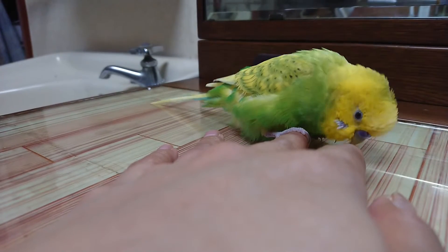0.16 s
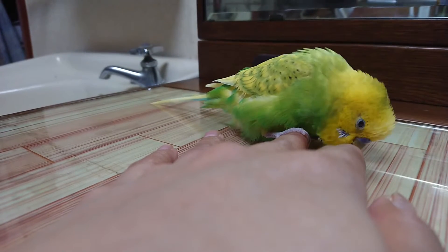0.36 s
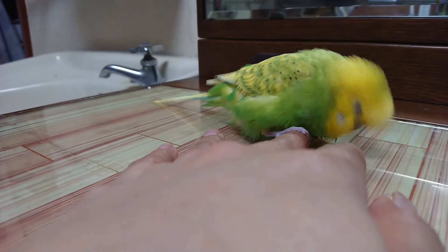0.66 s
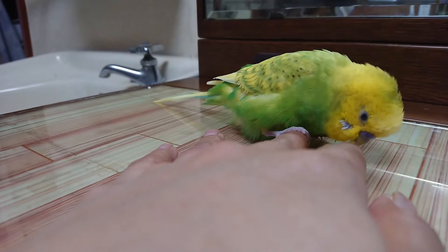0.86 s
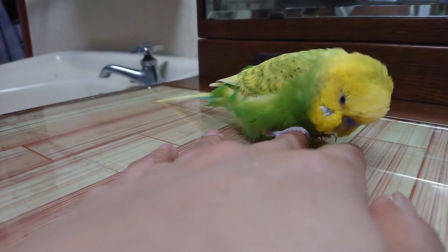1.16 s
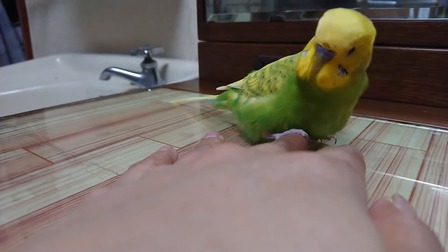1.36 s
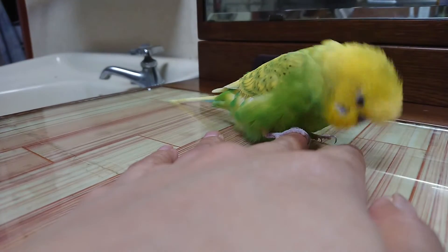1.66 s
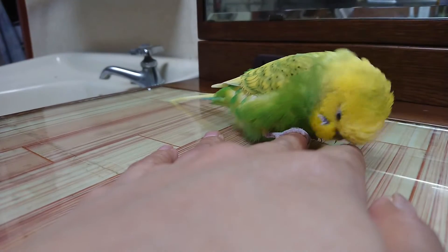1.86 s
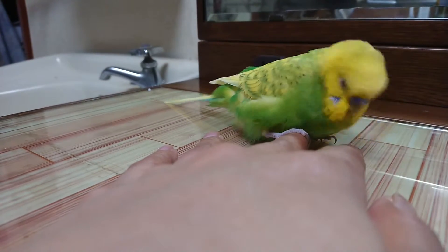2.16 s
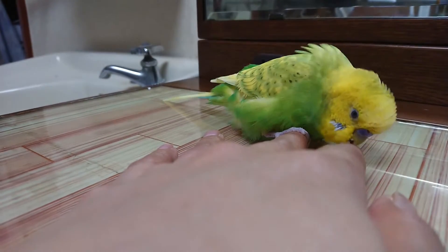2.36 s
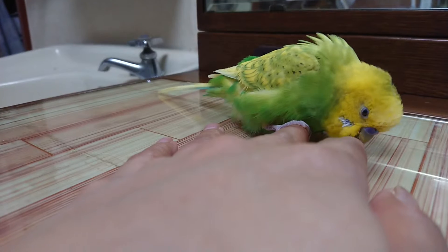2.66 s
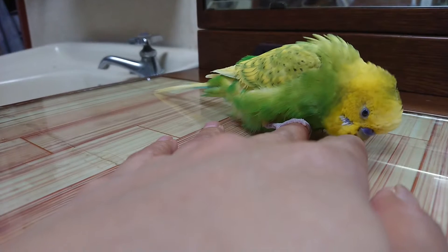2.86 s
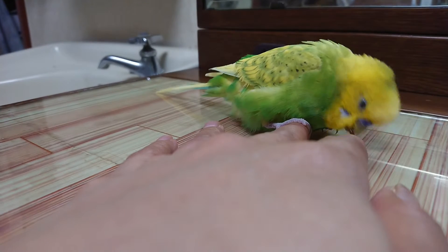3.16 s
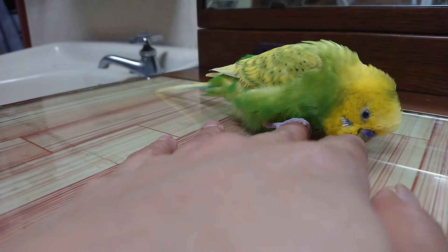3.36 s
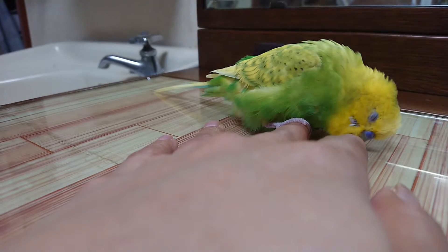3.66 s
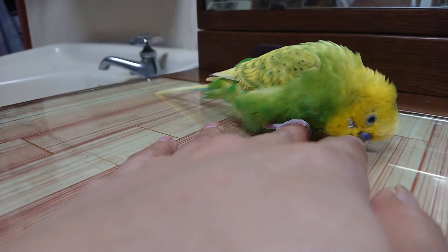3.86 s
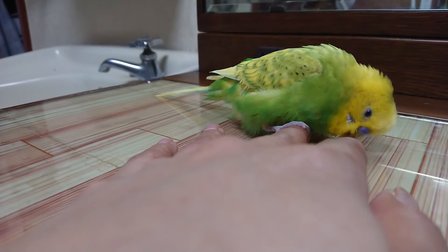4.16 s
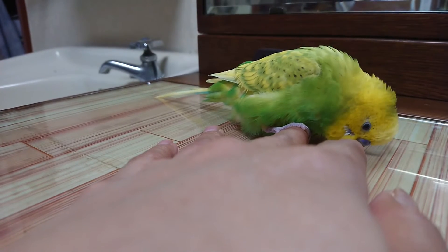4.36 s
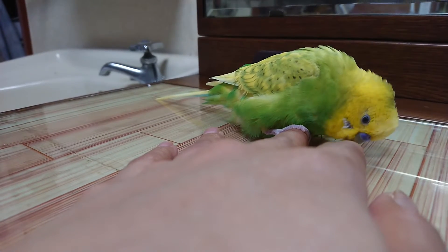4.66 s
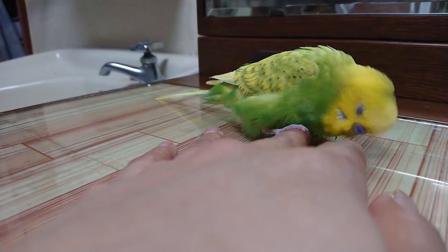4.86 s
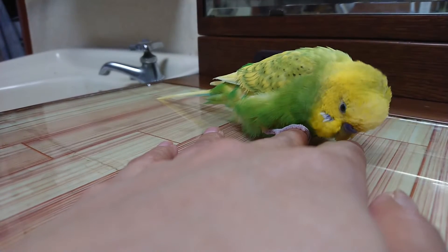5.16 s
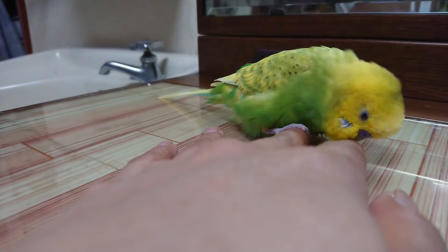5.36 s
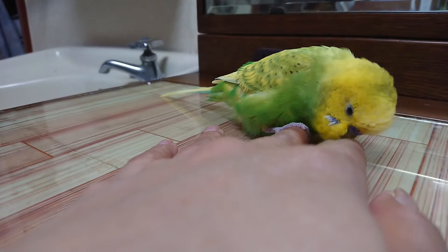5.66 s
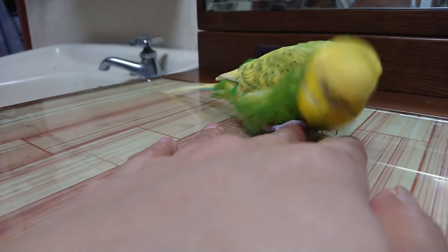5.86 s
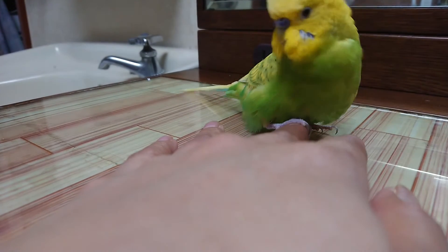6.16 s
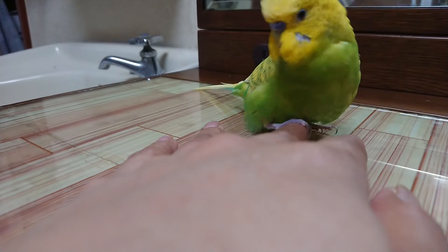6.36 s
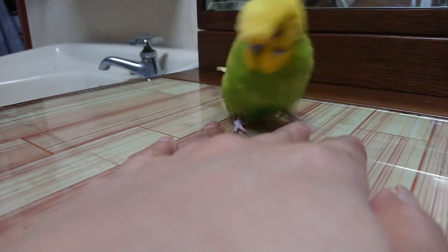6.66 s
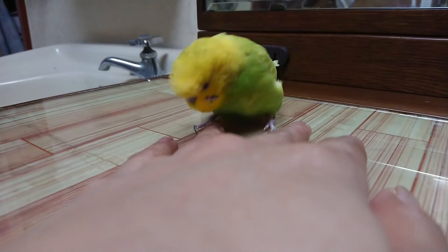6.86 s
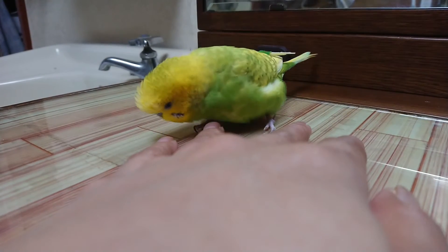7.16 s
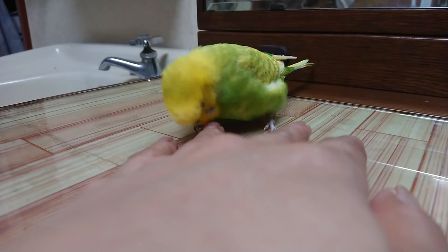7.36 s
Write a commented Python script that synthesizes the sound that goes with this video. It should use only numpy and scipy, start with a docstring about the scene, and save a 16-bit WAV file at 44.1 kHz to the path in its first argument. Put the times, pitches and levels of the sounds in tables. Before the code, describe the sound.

A budgerigar close to the right of a stereo microphone starts with light ticking and nibbling, then breaks into bright, fluttery chattering syllables with snapping clicks. Between bouts come tiny ticks, a feather brush and distant wavering chirps, plus a few rasping squawks in the room. A deep, unsteady hum like a vehicle outside swells and recedes beneath. The last run of chatter is densest and stops mid-song. Short, hard-walled indoor reverberation.

```python
"""Beak ticks and nibbles open the scene: a budgerigar sits on a washstand in a small hard room, close to
the right microphone. A low hum, probably a vehicle outside, soon rises and later falls, over room noise.
From 1.5 s the bird warbles in bouts: repeated syllables of gliding, fluttering whistles, with dry clicks.
Harsh shaken whistles squawk at 1.9 s and 4 s, and faint wavering chirps murmur between 2.2 s and 5.4 s.
The last bout, from 5.4 s, runs to the end. Clicks and ticks are ringing resonances; rustles are noise."""
import sys
import numpy as np
from scipy import signal
from scipy.fft import rfft, irfft, next_fast_len
from scipy.io import wavfile
from scipy.ndimage import map_coordinates

SR = 44100
rng = np.random.default_rng(int(sys.argv[2]) if len(sys.argv) > 2 else 0)


def int16_out(signal):
    """Quantize to a 16-bit WAV file."""
    q = np.round(np.clip(np.atleast_2d(signal).T, -1, 1) * 32767)
    wavfile.write(sys.argv[1], SR, q.astype(np.int16))


N = 331191
TIME = np.arange(N) / SR

# overtones of the whistle before throat and blowing: (multiple of the pitch, level/dB)
OVERTONES = [(2, -29), (3, -39.5), (4, -47.5)]
# colour of the hiss on rough notes: (f/Hz, level/dB per Hz)
RASP = [(700, -9), (1500, -11), (2800, 5.5), (4300, -7.5), (5800, -1), (9000, -8.5), (13000, -20.5)]


def song(treble_db, edge_s=0.0018, swell_db=5, flutter_hz=190, flutter_db=8, swing_hz=150, jitter_hz=50,
         wander_hz=80, rasp_db=-26, overtone_growth=0.43, full_db=-22, beak_hz=11500):
    """Each note is one glide of the syrinx; a slower second vibration shakes level and pitch of rough notes."""
    out, hiss = np.zeros(N), noise(RASP)
    jitter, unrest, wander = wobble(500), wobble(90), wobble(75)
    # the flutter's own speed strays around flutter_hz
    flutter = np.sin(phase_of(flutter_hz * np.exp(0.38 * unrest)))
    for s, length, pitches, note_db, rise_db, rough in glides():
        t = np.arange(int((length + edge_s) * SR)) / SR
        u = t / t[-1]
        span = (int(s * SR) + np.arange(len(t))) % N
        rough = np.clip(rough, 0, 1)
        # a smooth curve through start, middle and end pitch
        glide = np.polyval(np.polyfit([0, .5, 1], pitches, 2), u)
        shake_hz = swing_hz * flutter[span] + jitter_hz * jitter[span] + wander_hz * wander[span]
        phase = phase_of(glide + rough * shake_hz)
        # air pressure swells towards the middle of the note
        swell = swell_db * (np.sin(np.pi * u) - 2 / np.pi)
        level_db = note_db + rise_db * np.clip(2 * u - 1, -.5, .5) + swell
        gate = np.sin(np.pi / 2 * np.clip(np.minimum(t, t[-1] - t) / edge_s, 0, 1)) ** 2
        throb = rms_one(from_db(flutter_db * rough * flutter[span]))
        # harder blowing brings out the overtones
        blown_db = overtone_growth * (level_db - full_db)
        overtones = sum(from_db(db + blown_db) * throat(k * glide) * np.sin(round(k) * phase)
                        for k, db in OVERTONES)
        edge = np.sqrt(2) * throb * overtones + from_db(rasp_db) * rough * hiss[span]
        voice = np.sqrt(2) * throb * np.sin(phase) + from_db(treble_db[span]) * edge
        add(out, s - edge_s / 2, from_db(level_db) * gate * voice)
    return cut(out, beak_hz, "low", order=3)


# Syllable shapes, one row for each glide:
# (delay t/s, length t/s, start f/Hz, middle f/Hz, end f/Hz, level/dB, crescendo/dB, roughness 0-1)
# chirrup: a dip, a flick up, a high shelf and a deep scoop
CHIRRUP = [(0, .023, 4390, 2844, 3416, 0.5, 7.5, .6), (.024, .012, 3607, 4640, 4140, -11.5, -3, .2),
           (.035, .023, 4150, 3780, 3800, -2, 7.5, .45), (.057, .032, 3400, 2147, 3506, -3, 10.5, .6)]
# twitter: a dip, a fall, a rise and a rough shelf
TWITTER = [(0, 0.0299, 3990, 3140, 3730, -5.5, 7, 0.295), (.029, 0.016, 3520, 3053, 3060, -2, 11.5, .45),
           (.048, .024, 2050, 2570, 2780, -4, 4, .6), (.071, 0.031, 3490, 3390, 3610, -1, -1.5, 0.57)]
# stair: two rough steps upwards and a double top note
STAIR = [(0, .017, 2777, 2390, 1850, 0, -2.5, 0.79), (.018, .021, 3237, 3030, 2750, -1.4, 7.5, 0.86),
         (.039, .011, 3854, 3830, 3850, -0.23, -3, 0.4), (.051, .014, 3500, 3600, 3700, -1, 6.5, 0.55)]
# climb: two dips and a short top note
CLIMB = [(0, .03, 2950, 2081, 2790, -1.5, -2, 0.82), (.031, 0.025, 3550, 2937, 3240, 4.5, 0.5, .35),
         (.059, .013, 3315, 3495, 3310, 4, -9.5, 0.57)]
# swoop: two rises that lead to a clear, loud peak
SWOOP = [(0, .024, 1820, 2100, 2616, -10, 9, 0.97), (.026, .025, 1838, 2301, 3076, -7.5, 13.5, 0.61),
         (.052, .02, 3200, 2850, 2720, 2, -2.5, .3)]
# loop: a run-up, an accent, a dip and a tail
LOOP = [(-.012, 0.01, 2180, 2305, 2660, -11, 10.5, 0.94), (0, 0.014, 2520, 2627, 2580, 1.5, 2, 0.47),
        (.016, .019, 2050, 1965, 2350, -9.5, 1.5, 0.95), (.035, .016, 2376, 2720, 2800, -5.5, -7, .5)]
# growl: a low glide that sinks in two steps
GROWL = [(0, 0.019, 1842, 1619, 1623, 0, -2, 0.68), (.022, .015, 1501, 1400, 1285, 0, 0.78, 0.5)]
# hoot: one low, long scoop
HOOT = [(0.0019, .056, 1550, 1330, 1680, -1, -0.83, 0.61)]
# When each syllable is sung and how it is varied:
# (t/s, stretch in time, pitch factor, level/dB added to the shape, crescendo over the syllable/dB)
CHIRRUPS = [(1.545, 0.99, .99, -31.5, 4.5), (2.703, 0.97, 1.014, -28.5, 2), (3.712, 1.032, 0.99, -29.5, -1),
            (5.803, 1.01, 1.03, -32.5, 2.5), (6.539, 0.99, 0.96, -29.5, -3)]
TWITTERS = [(2.888, 0.98, 0.99, -25.5, 0), (3.924, 1, 0.96, -27.5, 2)]
STAIRS = [(1.75, 1, 0.98, -23, 9.5), (6.017, 0.95, .98, -31.5, -7), (6.751, 0.93, 1.01, -28.5, -2)]
CLIMBS = [(1.98, 0.98, 1.09, -25.5, 0.074), (5.417, 1, .92, -33, 0.98)]
SWOOPS = [(2.092, 0.97, 0.95, -26.5, -8.5), (3.027, 0.98, 1.048, -24.5, -0.5), (4.066, 1.02, 1, -24.5, 6),
          (5.532, .6, .96, -26, 3), (6.859, 0.69, 0.94, -29.5, -14.5)]
LOOPS = [(6.153, 0.82, 0.92, -30, 0), (6.279, 0.89, 0.95, -27, -6.5), (6.399, 0.97, 0.96, -24.5, 3.5),
         (7.007, 1, 0.95, -27.5, 5.5)]
GROWLS = [(1.818, 0.86, 0.94, -34.5, -5.5), (2.055, 1.12, .96, -38.5, -1.5), (2.991, 0.97, 1.06, -39, 2.5),
          (4.031, 0.94, 1.07, -43, 11), (5.494, 1.12, 1.03, -39, -8.5), (6.11, 1.05, .95, -42, 5.5),
          (6.823, 1.05, 1.06, -40.5, 2.5), (7.489, 0.64, 0.83, -44, -6.5)]
HOOTS = [(6.217, 0.8, 1, -38.5, 1.5), (6.327, 1.22, 1.03, -46, 3.5), (6.934, 1, 0.96, -36.5, 1)]
# single chips between the syllables: (t/s, length t/s, start f/Hz, end f/Hz, level/dB, roughness 0-1)
CHIPS = [(1.724, 0.029, 3350, 3620, -28, 0.34), (1.843, .012, 1710, 1915, -33, .9),
         (1.857, 0.012, 2930, 2995, -18, .2), (1.87, 0.015, 2624, 2740, -15, 0.64),
         (5.576, 0.0056, 2750, 2970, -30.5, .4), (5.587, .013, 2805, 2960, -31.5, 0.6),
         (6.096, 0.014, 2490, 2030, -40.5, .6), (6.732, .013, 3400, 3500, -41.5, 0.6),
         (5.995, .02, 3290, 3580, -40.5, 0.24), (6.456, 0.0096, 3050, 2980, -34.5, 0.88),
         (6.919, 0.0089, 2890, 4200, -35, .2), (7.065, 0.0065, 3100, 2950, -34.5, 0.75),
         (7.42, .012, 2870, 2750, -31.5, 0.23), (7.442, 0.015, 2310, 2900, -27.5, .43),
         (7.459, 0.013, 2810, 3000, -33.5, 0.5), (7.474, .012, 3750, 3880, -17.5, 0.7)]
CHIP_SAG = 0.063   # a chip sags in the middle by this share of its pitch


def glides():
    """Every glide of the song: syllables stretched, shifted in pitch and scaled; then the single chips."""
    syllables = [(CHIRRUP, CHIRRUPS), (TWITTER, TWITTERS), (STAIR, STAIRS), (CLIMB, CLIMBS),
                 (SWOOP, SWOOPS), (LOOP, LOOPS), (GROWL, GROWLS), (HOOT, HOOTS)]
    for shape, rows in syllables:
        whole = shape[-1][0] + shape[-1][1]
        for s, stretch, pitch, db, crescendo_db in rows:
            for delay, length, *hz, glide_db, rise_db, rough in shape:
                # where the glide sits in the syllable, from -0.5 to 0.5
                place = (delay + length / 2) / whole - .5
                level_db = db + glide_db + crescendo_db * place
                glide_rise_db = rise_db + crescendo_db * length / whole
                yield s + stretch * delay, stretch * length, pitch * np.array(hz), level_db, glide_rise_db, rough
    for s, length, start_hz, end_hz, db, rough in CHIPS:
        middle_hz = (1 - CHIP_SAG) * (start_hz + end_hz) / 2
        yield s, length, [start_hz, middle_hz, end_hz], db, 0, rough


def throat(hz, centre_hz=2700, width_hz=750, lift_db=33, upper_hz=7800, upper_width_hz=700, upper_db=7):
    """Two windpipe resonances lift the overtones as they glide through."""
    lower = lift_db / (1 + ((hz - centre_hz) / width_hz) ** 2)
    upper = upper_db / (1 + ((hz - upper_hz) / upper_width_hz) ** 2)
    return from_db(lower + upper)


# loud dry clicks besides the closing ones: (t/s, peak level/dB before click_db, brightness as centre f/Hz)
CLICKS = [(5.399, -38, 1500), (5.694, -23, 2630), (5.7, -11, 2440), (5.718, -32, 2680), (5.747, -10, 2560),
          (6.79, -24.5, 3790), (7.409, -28.5, 1370)]
# resonances of a click, before tilt and scatter: (f/Hz, width f/Hz, level/dB)
CLICK_MODES = [(770, 200, -12.5), (1280, 620, 1.5), (2450, 1300, 26.5), (3040, 490, 2.5), (5300, 230, -15),
               (6970, 280, -1), (12450, 1600, -19)]
# the clearest ticks of beak and claws: (t/s, peak level/dB before tick_db)
TICKS = [(0.1995, -50), (0.3063, -49), (0.5927, -55), (0.6473, -50.5), (0.8562, -46.5), (0.9901, -50),
         (1.0244, -53.5), (1.0825, -41), (1.1104, -44.5), (1.295, -47), (2.2593, -42.5), (2.4516, -36),
         (3.4062, -44.5), (3.5317, -44), (4.8259, -50), (4.8555, -51.5), (4.9122, -45.5), (4.9552, -53),
         (5.0796, -45), (5.1427, -39)]
# resonances of a tick, before tilt and scatter: (f/Hz, width f/Hz, level/dB)
TICK_MODES = [(954, 640, -10), (2830, 550, 0.5), (3550, 540, -12), (5610, 730, -4), (6760, 720, -5),
              (11800, 5400, -1)]
# bouts of nibbling: (start t/s, end t/s, highest possible nibble level/dB)
NIBBLING = [(.1, 0.999, -50), (0.998, 1.46, -51), (2.199, 2.7, -48.5), (3.1, 3.699, -53), (4.3, 5.31, -52),
            (4.8, 5.151, -44)]
# every chirrup ends in a click: delay before stretching, level above the chirrup's before click_db, brightness
CLOSING_S, CLOSING_DB, CLOSING_HZ = .0969, 6.5, 1850


def beak(click_db=4, tick_db=6, neutral_hz=2350, nibble_range_db=14, count=28):
    """Short blows ring small resonances: loud clicks, light ticks and bouts of tiny random nibbles."""
    out = np.zeros(N)
    closing = [(s + stretch * CLOSING_S, db + CLOSING_DB, CLOSING_HZ) for s, stretch, _, db, _ in CHIRRUPS]
    for s, db, centre_hz in closing + list(CLICKS):
        tilt = np.log(centre_hz / neutral_hz) * 2
        add(out, s + 0.00077, from_db(db + click_db) * snap(CLICK_MODES, tilt, scatter_db=5.5))
    for s, db in TICKS:
        add(out, s, from_db(db + tick_db) * snap(TICK_MODES, 0, scatter_db=8))
    for start, end, db in NIBBLING:
        for when, size, tilt in rng.random((count, 3)):
            nibble_db = db - nibble_range_db * (1 - size ** 2)
            nibble = snap(TICK_MODES, tilt - .5, scatter_db=3.0)
            add(out, start + when * (end - start), from_db(nibble_db) * nibble)
    return out


def snap(modes, tilt, scatter_db, rise_s=0.000088, lowest_hz=680):
    """One short blow into damped resonances, each with a random strength and slight detuning; peak 1."""
    hz, width, db = np.transpose(modes)[:, :, None]
    t = np.arange(SR // 80) / SR
    chance = rng.standard_normal((2, len(modes), 1))
    # a positive tilt favours the high resonances
    gain = from_db(db + scatter_db * chance[0]) * (hz / hz[0]) ** tilt
    tone = np.sin(2 * np.pi * hz * (1 + 0.018 * chance[1]) * t)
    ring = np.sum(gain * np.exp(-np.pi * width * t) * tone, axis=0)
    # so small a body radiates no bass
    ring = cut(ring * (1 - np.exp(-t / rise_s)), lowest_hz, "high", order=4)
    return ring / np.abs(ring).max()


# feathers brush: (t/s, length t/s, level/dB before the flicker)
BRUSHES = [(1.1, 0.041, -72), (1.207, 0.024, -59.5), (2.327, 0.024, -67), (3.398, 0.083, -56.5),
           (5.135, 0.061, -68)]
# colour of the rustle: (f/Hz, level/dB per Hz)
FEATHERS = [(1000, 1), (4600, 7.5), (6000, -16.5), (14000, -25)]


def feathers():
    """Short soft rustles of flickering noise as the head rubs along the hand."""
    swell = np.zeros(N)
    for s, length, db in BRUSHES:
        add(swell, s, from_db(db) * signal.windows.tukey(int(length * SR), .5))
    return swell * noise(FEATHERS) * from_db(4.8 * wobble(70))


# what the far, left microphone gets of the bird: (f/Hz, level/dB)
SHADE = [(800, -11.5), (1600, -10), (2700, -19.5), (4000, -19), (7000, -18.5), (13000, -15.5)]


def shaded(x):
    """The bird as the far microphone hears it: low notes bend round, high ones are screened."""
    size = next_fast_len(N)
    gain = from_db(at_hz(SHADE, np.fft.rfftfreq(size, 1 / SR)))
    return irfft(rfft(x, size) * gain, size)[:N]


# harsh squawks, probably of a second bird across the room:
# (t/s, length t/s, start f/Hz, end f/Hz, level/dB before the room)
SQUAWKS = [(1.876, 0.061, 2833, 2750, -29.5), (1.931, .05, 3300, 3420, -29), (4.03, 0.107, 2930, 3020, -28)]
# colour of their hiss: (f/Hz, level/dB per Hz)
SQUAWK_HISS = [(800, -30), (1800, -14), (3000, 15), (3600, 9), (4400, -12), (5800, -10), (9500, -12.5),
               (12000, -28.5), (15000, -34.5)]


def squawks(jitter_hz=170, shake_db=4, hiss_db=-7, taper=0.3285):
    """A whistle shaken so hard that it breaks up into a band of noise, with hiss around it."""
    out, hiss, jitter = np.zeros(N), noise(SQUAWK_HISS), wobble(600)
    shake = rms_one(from_db(shake_db * wobble(250)))
    for s, length, start_hz, end_hz, db in SQUAWKS:
        span = int(s * SR) + np.arange(int(length * SR))
        glide = np.linspace(start_hz, end_hz, len(span))
        tone = np.sqrt(2) * np.sin(phase_of(glide + jitter_hz * jitter[span]))
        swell = from_db(db) * signal.windows.tukey(len(span), taper) * shake[span]
        add(out, s, swell * (tone + from_db(hiss_db) * hiss[span]))
    return out


# the clearest faint chirps: (t/s, f/Hz around which the pitch bends, level/dB before the room)
FAR_CHIRPS = [(2.63, 2286, -57), (3.56, 3570, -59.5), (4.62, 3520, -60), (4.96, 2477, -56),
              (7.121, 3410, -52.5)]
# the murmur between them: time span, pitch range, middle level before the room
MURMUR_START_S, MURMUR_END_S = 2.25, 5.35
MURMUR_LOW_HZ, MURMUR_HIGH_HZ, MURMUR_DB = 1660, 2820, -58.5


def far_chirps(length_s=0.1, bend=0.11, blur=.05, scatter_db=5.0, count=26):
    """Faint wavering whistles that arrive only as room sound: a few clear ones and a running murmur."""
    out, arch = np.zeros(N), np.hanning(int(length_s * SR))
    waver = wobble(520)
    step = (MURMUR_END_S - MURMUR_START_S) / count
    murmur = []
    for k, (when, high, loud) in enumerate(rng.random((count, 3))):
        hz = MURMUR_LOW_HZ + high * (MURMUR_HIGH_HZ - MURMUR_LOW_HZ)
        murmur.append((MURMUR_START_S + step * (k + when), hz, MURMUR_DB + scatter_db * (2 * loud - 1)))
    for s, hz, db in list(FAR_CHIRPS) + murmur:
        # the pitch arches up or down at random
        arching = bend * rng.choice([-1, 1]) * (2 * arch - 3 / 2)
        glide = 1 + arching + blur * waver[int(s * SR):][:len(arch)]
        add(out, s - length_s / 4, from_db(db) * arch * np.sin(phase_of(hz * glide)))
    return out


# colour of the room's ring: (f/Hz, level/dB)
WALLS = [(300, 3), (1500, 4.5), (3500, -2), (7000, 3.5), (15000, -1)]
ROOM_T60_S = 0.24   # time for the ring to fall by 60 dB


def room(x, build_s=0.0012):
    """Dense reflections from close hard walls, different at each microphone; unit energy."""
    t = np.arange(SR // 2) / SR
    decay = from_db(-60 * t / ROOM_T60_S) * (1 - np.exp(-(t / build_s) ** 2))
    tails = [noise(WALLS, size=len(t)) * decay for side in range(2)]
    return np.array([signal.fftconvolve(x, rms_one(tail) / np.sqrt(len(t)))[:N] for tail in tails])


# the engine outside: (t/s, pitch f/Hz, level/dB before the room modes)
ENGINE = [(.6, 158.7, -82.5), (.95, 167.3, -74), (1.3, 177.2, -73.5), (1.7, 182.5, -83), (1.85, 169, -72),
          (2.2, 139, -62), (2.4, 124.9, -67.5), (2.55, 115.4, -69), (2.8, 102.3, -63.5), (3.1, 84.9, -68),
          (3.7, 80, -72), (4.4, 120.5, -68.5), (5.75, 102.7, -80), (6.2, 100.2, -95)]
# a deep drone under it, with a thin upper tone: (t/s, drone level/dB, upper tone f/Hz, upper tone level/dB)
DRONE = [(1.7, -78, 295, -95.5), (2.2, -69.5, 296.4, -95.5), (2.85, -57, 295.7, -71),
         (3.15, -58, 265.5, -70), (3.65, -60.5, 264.1, -67), (5.3, -68.5, 223.3, -86),
         (6.2, -76.5, 217, -102)]
DRONE_HZ = 70.4   # the pitch wavers around this


def hum(waver=.025, flicker_db=2.0, octave_db=-14):
    """A gliding engine note and a deep drone, both unsteady, heard through the walls."""
    pitch, level_db = in_time(ENGINE)
    drone_db, upper_hz, upper_db = in_time(DRONE)
    # each line: (pitch f/Hz, level/dB, share by which its pitch wavers)
    lines = [(pitch, level_db + boom(pitch), waver),
             (2 * pitch, level_db + octave_db + boom(2 * pitch), waver / 2),
             (DRONE_HZ, drone_db, .07),
             (upper_hz, upper_db, waver / 2)]
    out = np.zeros(N)
    for hz, db, unsteady in lines:
        loudness = np.sqrt(2) * from_db(db + flicker_db * wobble(15))
        out += loudness * np.sin(phase_of(hz * (1 + unsteady * wobble(10))))
    return out


# room modes that boom when the hum passes through them: (f/Hz, width f/Hz, lift level/dB)
ROOM_MODES = [(102.9, 10, 14), (165.9, 17, 10), (354, 16, 24)]


def boom(hz):
    """Lift in dB that the room's modes give to a low tone."""
    return sum(db / (1 + (2 * (hz - mode_hz) / width_hz) ** 2) for mode_hz, width_hz, db in ROOM_MODES)


# colour of the room noise: (f/Hz, level/dB per Hz)
AIR = [(18, -53.5), (30, -30.5), (98, 1), (194, -13.5), (245, -10), (554, -18.5), (1040, -14.5),
       (1190, -18), (2350, -23), (4190, -34.5), (7090, -43.5), (8300, -51.5), (12300, -42.5),
       (13300, -60.5), (16000, -78)]
# its loudness over time: (t/s, level/dB)
AIR_LEVEL = [(0, -72.5), (1.4, -64), (3, -63), (5.7, -61.5), (7.5, -62.5)]
# how alike it is left and right: (f/Hz, likeness 0-1)
LIKENESS = [(60, 0.6), (700, 0.1), (8000, 0)]


def air():
    """Room noise of slowly changing level, more alike at both microphones in the bass."""
    alike = np.clip(at_hz(LIKENESS, np.fft.rfftfreq(N, 1 / SR)), 0, 1)
    # mid is shared by both sides, side has opposite signs
    mid = rfft(noise(AIR)) * np.sqrt((1 + alike) / 2)
    side = rfft(noise(AIR)) * np.sqrt((1 - alike) / 2)
    return from_db(in_time(AIR_LEVEL)[0]) * irfft(np.array([mid + side, mid - side]), N)


def from_db(db):
    """Decibels to gain."""
    return 10 ** (np.asarray(db) / 20)


def rms_one(x):
    """Scale to an average strength (rms) of 1."""
    return x / np.sqrt(np.mean(x ** 2) + 1e-20)


def in_time(rows):
    """The columns of a table, joined by straight lines, at every sample."""
    s, *columns = np.transpose(rows)
    return [np.interp(TIME, s, c) for c in columns]


def at_hz(points, hz):
    """Read a spectrum on a log-frequency axis."""
    f, value = np.transpose(points)
    return np.interp(np.log(hz + 1), np.log(f), value)


def noise(spectrum, size=N):
    """Noise of the given colour, rms 1."""
    size_fft = next_fast_len(size)
    gain = from_db(at_hz(spectrum, np.fft.rfftfreq(size_fft, 1 / SR)))
    white = rng.standard_normal(size_fft)
    return rms_one(irfft(rfft(white) * gain, size_fft)[:size])


def wobble(rate):
    """Smooth random motion with about rate turns a second, rms 1."""
    steps = TIME * rate * 2
    points = rng.standard_normal(int(steps[-1]) + 2)
    return rms_one(map_coordinates(points, [steps], order=2, mode="nearest"))


def add(track, s, sound):
    """Mix a sound into a track at time s."""
    i = int(np.clip(s * SR, 0, N))
    track[i:i + len(sound)] += sound[:N - i]


def phase_of(hz):
    """Running phase of a pitch curve."""
    return 2 * np.pi * np.cumsum(hz) / SR


def delayed(x, s):
    """The same sound s seconds later."""
    return np.interp(TIME - s, TIME, x, left=0)


def cut(x, hz, kind, order):
    """Butterworth filter: "high" removes what lies below hz, "low" what lies above."""
    return signal.sosfilt(signal.butter(order, min(hz, SR / 2 - 1), kind, fs=SR, output="sos"), x)


# the head turns: (t/s, treble thrown at the microphone, level/dB)
HEAD = [(1.6, 1), (2.0, 1.5), (3.75, 4.5), (4.0, 6), (5.85, -0.5), (6.2, -10.5), (6.6, -4), (7.0, -8.5),
        (7.48, -3)]


def scene(wet_db=-12.5, room_left_db=-5.5, cabinet_db=-15, cabinet_s=0.0026, hum_left_db=-4, hum_right_db=2,
          air_left_db=-3, air_right_db=2):
    """The right microphone faces the bird; the left one gets it shaded, with the room around it."""
    bird = song(in_time(HEAD)[0]) + beak() + feathers()
    # the cabinet behind the bird throws one quick echo
    echo = from_db(cabinet_db) * delayed(bird, cabinet_s)
    direct = np.array([shaded(bird), bird + echo])
    into_room = from_db(wet_db) * bird + squawks() + far_chirps()
    reflected = room(into_room) * from_db([[room_left_db], [0]])
    outside = hum() * from_db([[hum_left_db], [hum_right_db]])
    return direct + reflected + outside + air() * from_db([[air_left_db], [air_right_db]])


def record(dry, cutoff_hz=15900):
    """The top is cut steeply."""
    return signal.sosfilt(signal.ellip(10, .1, 70, cutoff_hz, fs=SR, output="sos"), dry)


dry = scene()
out = record(dry)
int16_out(out)
```